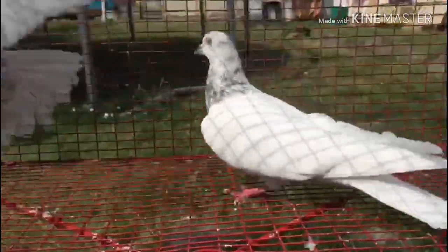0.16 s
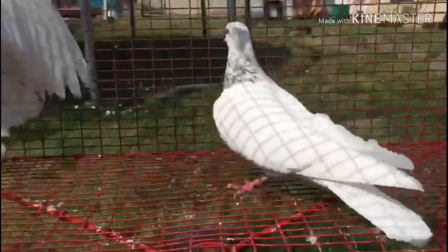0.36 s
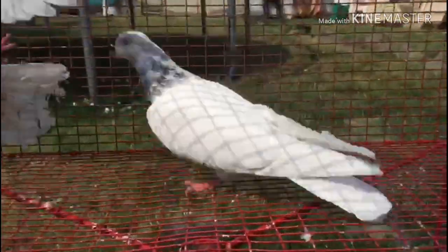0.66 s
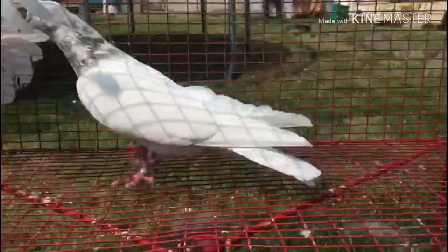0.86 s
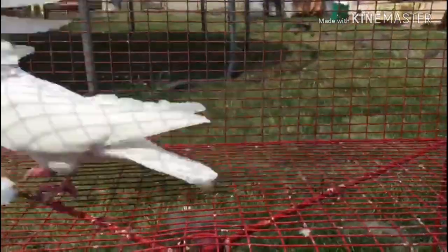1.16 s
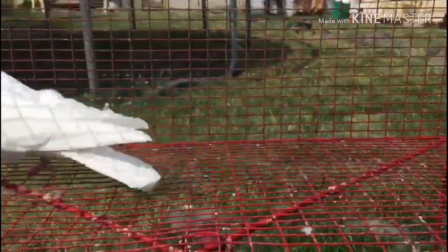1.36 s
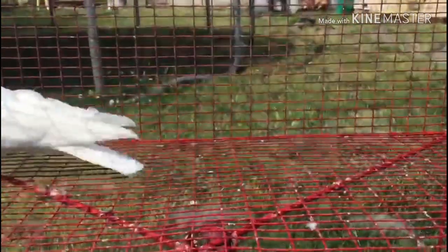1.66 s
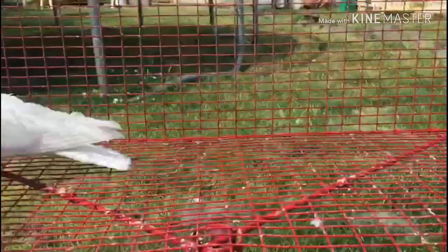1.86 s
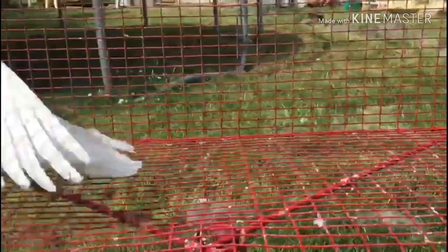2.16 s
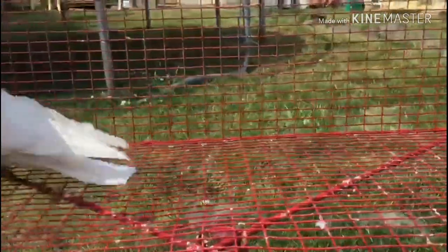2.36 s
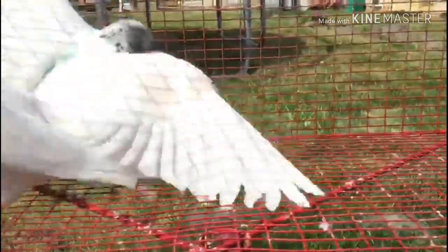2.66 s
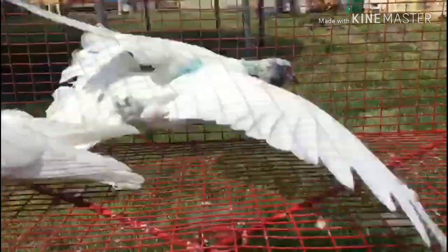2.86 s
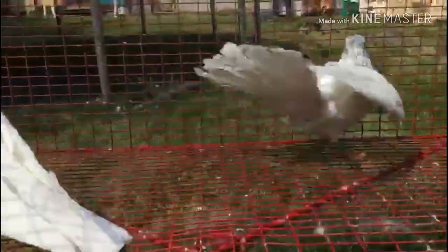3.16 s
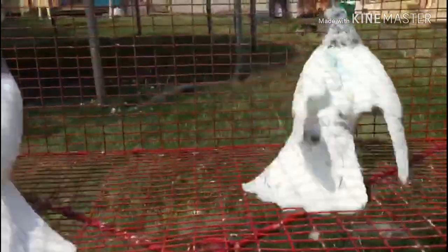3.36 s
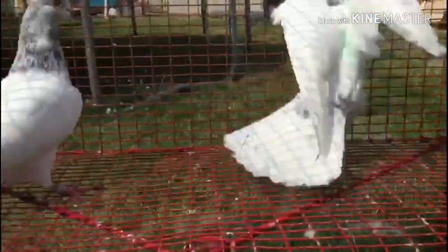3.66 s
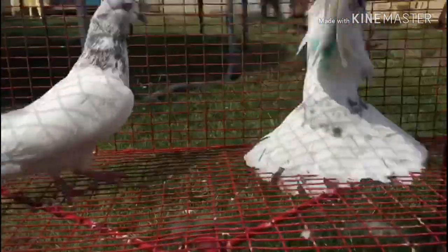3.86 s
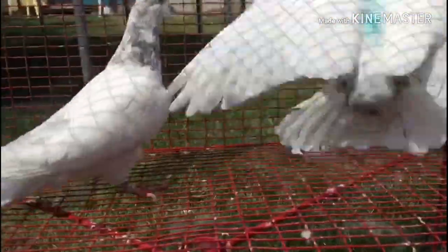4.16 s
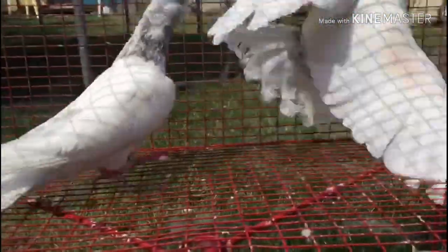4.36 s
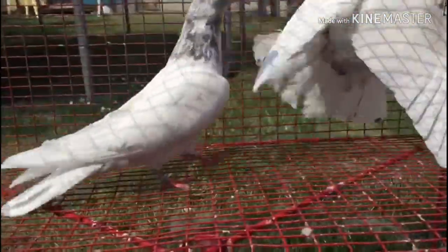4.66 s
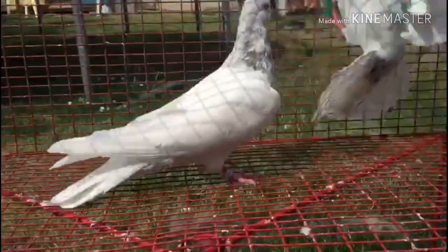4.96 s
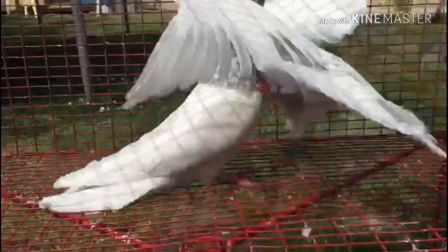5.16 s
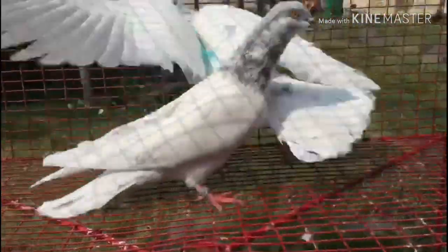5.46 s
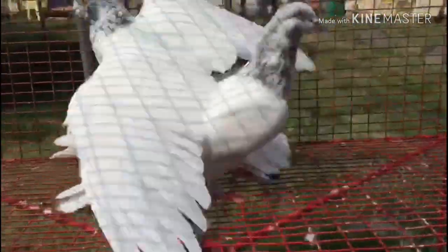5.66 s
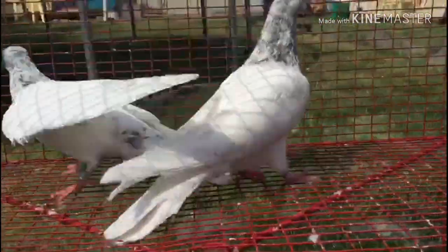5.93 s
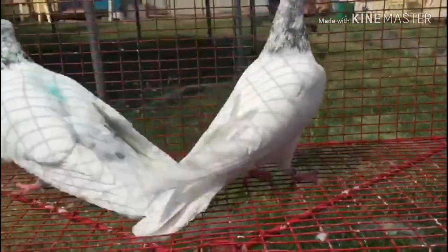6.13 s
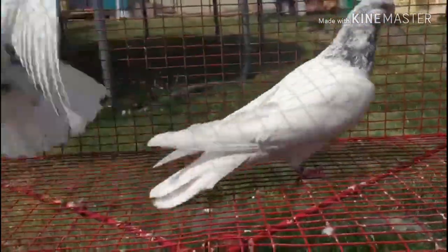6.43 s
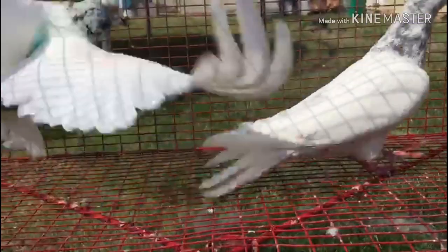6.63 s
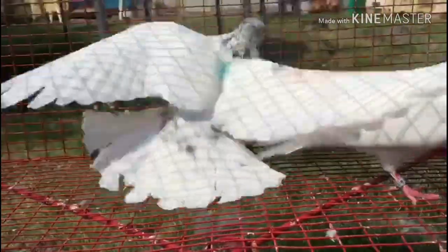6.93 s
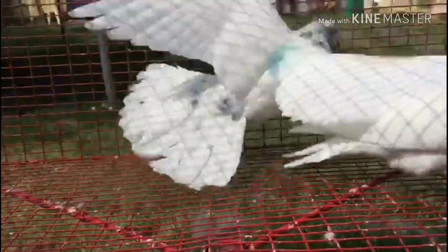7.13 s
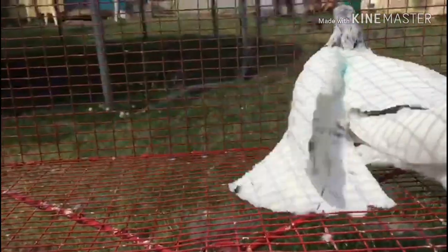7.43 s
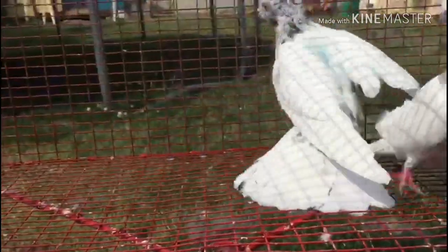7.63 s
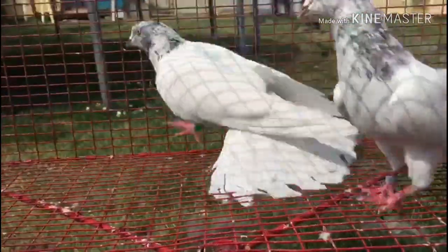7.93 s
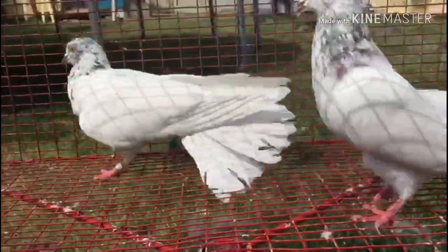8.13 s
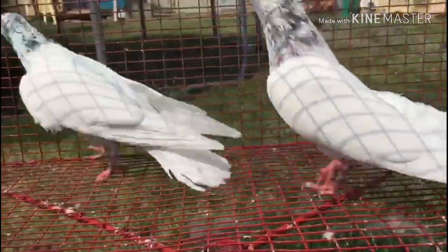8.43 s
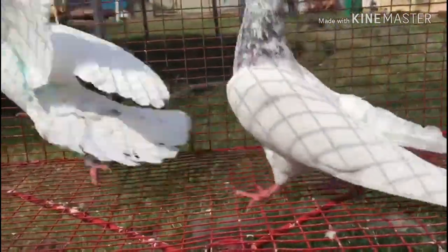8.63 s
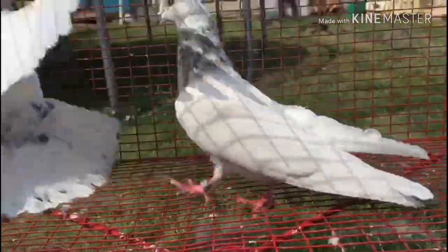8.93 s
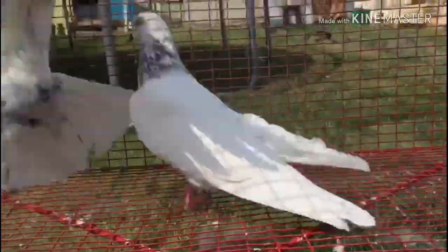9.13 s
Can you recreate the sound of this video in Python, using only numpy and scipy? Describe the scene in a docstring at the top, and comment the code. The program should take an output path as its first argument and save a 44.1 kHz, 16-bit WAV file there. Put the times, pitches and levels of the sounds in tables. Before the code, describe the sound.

Very close, dry outdoor sound of pigeons beating their wings behind wire mesh. Opening rustles and slaps lead to a hard wing clap, then thin out. Wings start again and batter the microphone in a rapid, overloaded cluster of thuds and cracks, followed by crisp claps. Lighter flapping returns, fades to soft coos and small metallic pings over faint open air, and flares up at the end.

```python
"""Pigeons fluttering in a wire cage

Two pigeons flutter on a lawn, a hand's width from the microphone. Feather friction is a train of
stick-slip clicks in swelling swishes; wing strokes crowd such clicks into slaps, and trapped air pops.
Damped low swings make the puffs of air and the thuds of one flurry that knocks the microphone.
Clusters of close modes ring as a wire pings; gliding tones coo nearby and filtered noise coos far off,
over outdoor air of shaped noise and a faint hum that is a sine of uneven level."""
import sys
import numpy as np
from scipy import signal
from scipy.fft import rfft, irfft
from scipy.io import wavfile
from scipy.ndimage import uniform_filter1d

SR = 44100
rng = np.random.default_rng(int(sys.argv[2]) if len(sys.argv) > 2 else 0)


def pcm_store(signal):
    """Save signal as 16-bit PCM."""
    levels = np.round(np.clip(np.atleast_2d(signal), -1, 1) * 32767)
    wavfile.write(sys.argv[1], SR, levels.astype(np.int16).T)


N = 409600

# Levels in the tables are relative; each layer adds its own offset. Brightness acts above 900 Hz only.
# Outdoor air, spectral density: [f/Hz, level/dB]
AIR_SPECTRUM = [(15, -30.5), (25, -14.5), (83, -5), (485, -2), (645, -2), (2560, -15.5), (3150, -18),
                (5030, -17.5), (5730, -16.5), (11300, -26.5), (12500, -53.5), (16200, -79.5), (22000, -120)]
# Pigeons cooing farther off: [t/s, level/dB]
FAR_COOING = [(0, -64.5), (2.4, -68.5), (3.1, -65.5), (4.6, -66.5), (6.2, -71.5), (9.29, -77.5)]
# Soft coos nearby: [t/s, length/s, start f/Hz, end f/Hz, level/dB]
NEAR_COOS = [(0.67, 0.15, 383, 295, -53), (1.858, 0.18, 515, 459, -54), (2.02, 0.2, 460, 433, -54.5),
             (2.977, 0.066, 375, 328, -52), (3.105, .075, 398, 360, -63), (3.252, 0.085, 419, 333, -63.5),
             (3.544, 0.2, 393, 405, -61.5), (7.48, 0.047, 625, 660, -66), (7.619, 0.056, 466, 480, -65),
             (7.8, 0.31, 485, 495, -58.5), (8.2, .06, 720, 746, -62.5)]
# Claws and quills catching a wire: [t/s, initial level/dB, central f/Hz]
WIRE_PINGS = [(2.3329, -29, 1860), (2.345, -36, 2760), (3.3039, -43.5, 4790), (3.4844, -46, 1970),
              (6.061, -41.5, 5700), (6.063, -48.5, 2903), (8.112, -33.5, 5830), (8.329, -46, 5640),
              (8.385, -46.5, 5420)]
# Breeze on the microphone: [t/s, level/dB]
BREEZE = [(0, -60), (2.3, -64.5), (3.6, -62.5), (6, -59.5), (7.5, -65), (8.6, -72.5), (9.29, -69)]
# Air pushed at the microphone by a downstroke: [t/s, level/dB, nominal swing f/Hz]
AIR_PUFFS = [(0.08, -20, 129), (0.243, -20, 80), (0.349, -30.5, 99), (1.098, -28, 104), (1.17, -16, 100),
             (1.212, -29, 140), (1.256, -22, 170), (1.313, -14, 124), (1.43, -18.5, 72),
             (2.151, -27.5, 174), (2.672, -21, 114), (2.705, -27, 190), (2.823, -20, 187),
             (2.861, -23, 175), (3.04, -29, 230), (4.222, -14.5, 102), (4.371, -14.5, 99),
             (4.431, -25, 186), (5.203, -11.5, 85), (5.271, -22, 154), (5.407, -31, 188), (6.501, -28, 100),
             (6.593, -27, 262), (6.637, -24, 162), (6.761, -20, 92), (6.805, -23, 91), (6.864, -16.5, 92),
             (6.925, -22.5, 105), (7.062, -23, 95), (7.304, -26.5, 161), (9.139, -22, 123),
             (9.209, -16.5, 118), (9.265, -14.5, 98)]
# Low eddies of air at the microphone, spectral density: [f/Hz, level/dB]
EDDY_SPECTRUM = [(18, -54.5), (30, -17), (64, 5), (125, 1.5), (267, -5), (377, -8), (430, -15.5),
                 (538, -17), (700, -22.5), (910, -39.5), (1540, -120)]
# Wings striking the housing: [t/s, crack level/dB, thud level/dB, nominal thud f/Hz, brightness/(dB/octave)]
HOUSING_KNOCKS = [(4.7579, -11, -9, 174, 0), (4.7814, -2.5, -15, 220, 0.5), (4.820, -16, -21.5, 153.3, 2),
                  (4.838, -6, -7.5, 278, -6.5), (4.871, 0, -18, 264, 1.5), (4.895, -10, -30, 101, 4.5)]
# Crack of a knock, spectral density: [f/Hz, level/dB]
CRACK_SPECTRUM = [(240, -23.5), (400, -1.5), (604, -2.5), (1760, 5), (2050, -4.5), (3430, -7), (3740, -16),
                  (7720, -30), (9290, -55), (12000, -49.5), (15600, -76), (22000, -120)]
# Flurries of rubbing feathers:
# [start t/s, end t/s, level/dB, brightness/(dB/octave), draught level at the microphone/dB]
FLURRIES = [(0, 0.38, -47, 2.5, -52), (0.435, 0.56, -47.5, 0, -58), (0.852, 1.06, -48, 1, -64),
            (1.07, 1.32, -45, 0, -48), (1.42, 1.66, -50, 3, -59), (1.89, 2.24, -56, -1, -60.5),
            (2.68, 2.862, -48, -2, -42), (3.856, 4.1, -46.5, 1.5, -50.5), (4.12, 4.438, -45, -1.5, -45.5),
            (4.46, 4.69, -46.5, 1, -63), (4.756, 5.291, -40, -3.5, -32.5), (5.302, 5.554, -47.5, -2.5, -42),
            (5.574, 5.836, -46, 1.5, -49), (6.463, 6.52, -57, 5, -46), (6.623, 7.063, -48.5, 3, -46),
            (7.117, 7.284, -52, 0, -56), (7.811, 8.139, -52.5, 1.5, -69.5), (8.782, 9.057, -44, 0.5, -55.5),
            (9.098, 9.3, -46, 1, -43.5)]
# A wing or tail sweeping past, one swish each: [peak t/s, level/dB, length/s, brightness/(dB/octave)]
SWEEPS = [(0.005, -27.5, 0.093, -2), (0.078, -34, 0.4, 0.0), (0.245, -33, 0.28, -1.5),
          (0.47, -37.5, 0.16, 1.5), (0.526, -37.5, 0.13, -0.5), (0.691, -36.0, 0.23, 1),
          (0.738, -40, 0.05, -2), (0.961, -35, 0.24, 0), (1.099, -31.5, 0.18, 0.5), (1.267, -38.5, 0.31, 0),
          (1.428, -32.5, 0.105, -0.5), (1.51, -43, 0.4, 1), (1.697, -44, 0.11, 0.5),
          (1.869, -39, 0.32, -1.5), (2.026, -42.5, 0.36, 2), (2.177, -40.5, 0.18, 1.5),
          (2.322, -49, 0.51, 0.5), (2.719, -38.5, 0.34, 0.5), (2.827, -36.5, 0.3, 0.0),
          (3.043, -26.5, 0.074, 2.0), (3.163, -49.5, 0.17, 4), (3.244, -45, 0.093, 5),
          (3.308, -52, 0.13, 6.5), (3.466, -48, 0.075, 4), (3.585, -55.5, 0.069, 3), (3.783, -59, 0.26, 6),
          (3.843, -43.5, 0.085, -0.5), (3.946, -38.5, 0.22, 0), (4.162, -32.5, 0.19, -1.0),
          (4.275, -34.5, 0.37, -0.5), (4.435, -37.5, 0.38, 1.5), (4.596, -37, 0.093, -1),
          (4.661, -43.5, 0.18, 3), (4.783, -20.5, 0.074, -7), (4.859, -24, 0.21, -7.5),
          (4.973, -30.5, 0.36, -1), (5.11, -34, 0.18, 1.5), (5.166, -27.5, 0.06, -1.5),
          (5.254, -21, 0.051, 0.5), (5.37, -34.0, 0.196, 0.0), (5.55, -35.5, 0.058, -0.5),
          (5.644, -38.0, 0.177, 1.5), (5.77, -26, 0.051, 0.5), (5.93, -58, 0.38, 3), (6.362, -55, 0.23, 2),
          (6.49, -31.5, 0.12, -0.5), (6.651, -32.5, 0.26, -0.5), (6.804, -37.5, 0.16, -2.5),
          (6.905, -38, 0.51, 0), (7.051, -33.0, 0.13, -0.5), (7.178, -34.5, 0.12, 4),
          (7.242, -36.5, 0.12, 1.5), (7.391, -44.5, 0.14, 0.5), (7.579, -52.5, 0.03, 0.0),
          (7.669, -50, 0.099, 5.5), (7.872, -43, 0.071, 2.0), (8.019, -48, 0.32, 1),
          (8.131, -43.5, 0.06, 1.5), (8.324, -55, 0.19, 4), (8.828, -48.0, 0.29, 1.5),
          (8.9, -36.5, 0.1, -0.5), (9.114, -32.0, 0.18, -1.5), (9.186, -25, 0.082, -2.5),
          (9.263, -30, 0.073, -0.5)]
# Rubbing feathers, spectral density: [f/Hz, level/dB]
FEATHER_SPECTRUM = [(120, -28), (200, -5.5), (443, -3.5), (575, -4.5), (812, -7), (917, -3.5), (2180, -5.5),
                    (2460, -4.5), (4200, -6), (4910, -6.5), (5740, -3), (7700, -7.5), (9310, -4.5),
                    (11500, -10), (12500, -23.5), (16200, -61.5), (22000, -120)]
# Wings meeting squarely: [t/s, initial level/dB, air pocket f/Hz]
WING_CLAPS = [(0.0805, -9.5, 2570), (1.314, -3, 2900), (4.3683, -18, 1410), (5.2428, -6.5, 1790),
              (5.7578, -18, 876)]
# Slaps of a wing on the other wing or the mesh: [t/s, level/dB, brightness/(dB/octave)]
WING_STROKES = [(.012, -25, -.5), (.081, -13.5, 2.2), (.194, -26, 0.5), (.221, -32, -1),
                (.2493, -20.5, 0.5), (.264, -32, 1), (.2867, -31, 0), (.3023, -30.5, 6), (.506, -39, 2),
                (.4668, -34.5, 2), (.574, -37.5, 2), (1.0684, -28, -2.5), (1.089, -27, 6),
                (1.0935, -24, -3), (1.0985, -23, -2), (1.1704, -22, 0.5), (1.2127, -29.5, -3.5),
                (1.259, -31.5, -22), (1.3156, -10, 1), (1.418, -28, -20), (1.4243, -20.5, -0.5),
                (1.703, -39, 0.5), (2.1514, -37.5, -5), (2.6893, -27.5, 3), (2.8258, -26, -3.5),
                (2.8596, -24.5, -3), (3.0392, -21.5, 1.5), (3.4893, -50, -1.5), (3.833, -35, 2.2),
                (3.974, -37.5, -2), (4.003, -29.5, 1.5), (4.2213, -25, 2.5), (4.27, -24.5, 0),
                (4.281, -28.5, -2), (4.344, -30, -2.5), (4.3688, -18, 0), (4.439, -30, -2),
                (4.484, -33, 1.5), (4.5692, -33, 3), (4.586, -32, 2), (4.917, -25, 1), (4.974, -24, 7),
                (5.0028, -23.5, -1), (5.1093, -25.5, 1), (5.1606, -25, 1.5), (5.189, -26.5, 2.5),
                (5.2026, -22.5, -1), (5.2435, -12, 1.5), (5.2475, -13.5, 2), (5.27, -20, 7),
                (5.3354, -30.5, 2), (5.363, -32.5, 0), (5.4087, -25, 0), (5.6305, -33, 2), (5.759, -24, 1),
                (5.7631, -22, 2.5), (5.775, -27, 2.5), (6.4693, -28.5, 1.5), (6.4983, -28, 1),
                (6.595, -43, -13), (6.641, -29.5, -0.5), (6.683, -27, 2), (6.696, -25, 0.5),
                (6.753, -31.5, 0.5), (6.797, -29, -0.5), (6.812, -33, 1.5), (6.8664, -32, 0.5),
                (6.928, -28.5, -1.5), (6.937, -29, -.5), (7.001, -36.5, 7), (7.0317, -33, -2),
                (7.06, -30, -3.5), (7.262, -37, 2.5), (7.3713, -34, 0), (7.813, -41.5, 1.5),
                (8.7826, -40.5, -3.5), (8.822, -36.5, -0.5), (8.861, -36, -1), (8.89, -33, -0.5),
                (8.975, -38.5, 1), (9.0223, -32.5, 5), (9.0613, -31.5, -1.5), (9.1059, -27.5, 2.5),
                (9.1573, -23.5, 2.5), (9.196, -29, -3), (9.2437, -28, 3), (9.2655, -25, -1)]
# Slapping quills and scraped wire, spectral density: [f/Hz, level/dB]
SLAP_SPECTRUM = [(120, -36.5), (200, -1.5), (1130, 1), (1680, 0.5), (2140, -1.5), (2820, -2), (3850, -2),
                 (4830, -6), (5640, -3), (7440, -7.5), (9310, -5.5), (11500, -12), (12500, -26),
                 (16200, -55.5), (22000, -120)]

AIR_DB = -70.5
HUM_HZ, HUM_DB = 57.6, -66.5
FAR_COO_HZ, FAR_COO_WIDTH_HZ = 355, 85
SHUFFLE_DB = -66.5   # the birds are never quite still
START_DB_PER_S, SETTLE_DB_PER_S = 1098.5, 267.5   # slopes at the two ends of a flurry
SWELL_SHARE, SWEEP_DEPTH_DB = 0.37, 21   # rising share of a swish; how far below its peak its ends lie
WAKE_S, SHUDDER_S = 0.052, 0.1   # length of the eddies around a puff; time a knock's rumble takes to fall 20 dB
# a slap's time constant at that level; one this much harder has half of it; upper limit
SLAP_S, SLAP_AT_DB, HALVING_DB, LONGEST_SLAP_S = .002, -27, 20, .0036
CUTOFF_HZ = 12200
BURST, LEAD_S = 4096, .003   # samples in a short sound; silence before a burst
TIME = np.arange(N) / SR
AGE = np.arange(BURST) / SR
STEPS = TIME[::44]   # coarse clock for slow movements


def from_db(db):
    """Logarithmic level: 20 dB is a factor of ten in amplitude."""
    return 10 ** (np.asarray(db) / 20)


def rms_one(x):
    """Normalization: the mean square becomes 1."""
    return x / np.sqrt(np.mean(x ** 2) + 1e-20)


def in_time(rows):
    """Linear interpolation: each column of a curve at every sample."""
    s, *columns = np.transpose(rows)
    return [np.interp(TIME, s, column) for column in columns]


def add(out, s, sound):
    """Superposition: pressures add, from a given time on."""
    start = max(round(s * SR), 0)
    out[start:start + len(sound)] += sound[:N - start]


def gain_at(spectrum, hz):
    """Spectral envelope: levels are interpolated along logarithmic frequency."""
    points, db = np.transpose(spectrum)
    return from_db(np.interp(np.log(hz + 1), np.log(points), db))


def tilted(hz, brightness):
    """Spectral slope: constant dB per octave about 3 kHz, flat below 900 Hz."""
    return from_db(brightness * np.log2(np.maximum(hz, 900) / 3000))


def coloured(x, spectrum):
    """Linear filtering: a signal takes on a spectral envelope, at rms 1."""
    hz = np.fft.rfftfreq(len(x), 1 / SR)
    return rms_one(irfft(rfft(x) * gain_at(spectrum, hz), len(x)))


def wobble(rate, size=N):
    """Random modulation: straight lines join this many normal values a second."""
    place = np.arange(size) * rate / SR
    count = int(place[-1]) + 2
    return np.interp(place, np.arange(count), rng.standard_normal(count))


def barbs(per_s, spread_db, hiss, size=N):
    """Stick-slip friction: barbs catch and slip as uneven clicks on a smooth hiss."""
    slips = (rng.random(size) < per_s / SR) * rng.choice([-1, 1], size)
    sizes = from_db(spread_db * np.minimum(rng.exponential(1, size), 4))
    return rms_one(slips * sizes) + hiss * rng.standard_normal(size)


def burst(slips, length, spectrum, brightness, blur_hz):
    """Impact transient: a fast swell and slower fall in one colour; rms 1 over twice its time constant."""
    age = np.maximum(AGE - LEAD_S, 0) / length
    shape = rfft(slips * np.sqrt(age) * np.exp(-age))
    hz = np.fft.rfftfreq(BURST, 1 / SR)
    # only the fine ripple of the spectrum is left to chance
    broad = uniform_filter1d(np.abs(shape) ** 2, int(blur_hz / hz[1]) + 1)
    ripple = shape / np.sqrt(broad + 1e-12)
    sound = irfft(ripple * gain_at(spectrum, hz) * tilted(hz, brightness), BURST)
    return sound * np.sqrt(2 * length * SR / np.sum(sound ** 2))


def swing(hz, cycles, sag):
    """Damped oscillation: a pressure push and its rebound, slowing as it dies away."""
    turns = hz * AGE * (1 + sag * np.exp(-hz * AGE)) / (1 + sag / 2)
    decay = from_db(-60 * turns / cycles)
    onset = 1 - np.exp(-12 * turns)
    return -np.sin(2 * np.pi * turns) * decay * onset


def outdoor_air():
    """Ambient noise: a stationary random pressure with a fixed spectral envelope."""
    return from_db(AIR_DB) * coloured(rng.standard_normal(N), AIR_SPECTRUM)


def hum():
    """Amplitude modulation: a faint low sine whose level wavers at random."""
    return from_db(HUM_DB + 3.7 * wobble(rate=27)) * np.sqrt(2) * np.sin(2 * np.pi * HUM_HZ * TIME)


def far_coos(swell_db):
    """Incoherent summation: many distant coos blur into one low, swelling band of noise."""
    level, = in_time(FAR_COOING)
    hz = np.fft.rfftfreq(N, 1 / SR)
    resonance = 1 / (1 + (2 * (hz - FAR_COO_HZ) / FAR_COO_WIDTH_HZ) ** 2)
    drone = irfft(rfft(rng.standard_normal(N)) * resonance, N)
    return from_db(level + swell_db * wobble(rate=10)) * rms_one(drone)


def coos(level_db, waver, breathy):
    """Modulated phonation: a gliding throat tone is blurred by a husky purr."""
    out = np.zeros(N)
    for s, length, start_hz, end_hz, db in NEAR_COOS:
        size = int(length * SR)
        pitch = np.linspace(start_hz, end_hz, size) * (1 + waver * wobble(rate=100, size=size))
        # complex modulation varies both amplitude and phase
        purr = 1 + breathy * (wobble(rate=140, size=size) + 1j * wobble(rate=86, size=size))
        tone = rms_one(np.real(purr * np.exp(2j * np.pi * np.cumsum(pitch) / SR)))
        add(out, s, from_db(db + level_db) * signal.windows.tukey(size, .5) * tone)
    return out


def pings(level_db, t60, spread, scrape_db):
    """Modal resonance: a short scrape sets joined wires ringing in a cluster of close modes."""
    out = np.zeros(N)
    for s, db, hz in WIRE_PINGS:
        modes = hz * np.exp(spread * rng.standard_normal((24, 1)))
        phases = rng.random((24, 1))
        ring = rms_one(np.sin(2 * np.pi * (modes * AGE + phases)).sum(axis=0))
        friction = barbs(per_s=2000, spread_db=7.5, hiss=0.4, size=BURST)
        scrape = from_db(scrape_db) * coloured(friction, SLAP_SPECTRUM)
        add(out, s, from_db(db + level_db - 60 * AGE / t60) * (ring + scrape))
    return out


def swell(s, db, length):
    """Exponential growth and decay: one movement's power rises to a peak and fades more slowly."""
    place = (STEPS - s) / length
    depth = np.maximum(-place / SWELL_SHARE, place / (1 - SWELL_SHARE))
    return from_db(db - SWEEP_DEPTH_DB * np.minimum(depth, 10)) ** 2


def held(start, end, db):
    """Sustained excitation: a flurry's power starts abruptly, holds and settles."""
    below = np.maximum((start - STEPS) * START_DB_PER_S, (STEPS - end) * SETTLE_DB_PER_S)
    return from_db(db - np.clip(below, 0, 200)) ** 2


def feather_motion():
    """Addition of powers: flurries and sweeps give rows of t/s, level/dB, brightness/(dB/octave)."""
    parts = [(swell(s, db, length), brightness) for s, db, length, brightness in SWEEPS]
    parts += [(held(start, end, db), brightness) for start, end, db, brightness, _ in FLURRIES]
    power = sum(p for p, _ in parts) + from_db(SHUFFLE_DB) ** 2
    # weighting by power lets the loudest movement set the colour
    colour = sum(p * brightness for p, brightness in parts) / power
    return np.transpose([STEPS, 10 * np.log10(power), colour])


def wing_air(motion, puff_db, draught_db, stir_db, wake_db, shudder_db, lumpy_db):
    """Flow noise: downstrokes push low puffs; eddies follow flurries and puffs and rumble after knocks."""
    out = np.zeros(N)
    for s, db, hz in AIR_PUFFS:
        add(out, s, from_db(db + puff_db) * swing(hz, cycles=2.3, sag=0.41))
    breeze = from_db(np.interp(STEPS, *np.transpose(BREEZE))) ** 2
    stir = from_db(motion[:, 1] + stir_db) ** 2
    draught = sum(held(start, end, db + draught_db) for start, end, _, _, db in FLURRIES)
    wake = sum(swell(s, db + wake_db, WAKE_S) for s, db, _ in AIR_PUFFS)
    power = breeze + stir + draught + wake
    for s, _, thud, _, _ in HOUSING_KNOCKS:
        rumble_db = thud + shudder_db - 20 * np.abs(STEPS - s) / SHUDDER_S
        power = power + (STEPS > s) * from_db(rumble_db) ** 2
    eddies = coloured(rng.standard_normal(N), EDDY_SPECTRUM) * from_db(lumpy_db * wobble(rate=50))
    return out + np.interp(TIME, STEPS, np.sqrt(power)) * eddies


def knocks(crack_db, thud_db, crack_s):
    """Structural impact: a blow on the housing gives a dull crack and a heavy, quickly damped thud."""
    out = np.zeros(N)
    for s, crack, thud, hz, brightness in HOUSING_KNOCKS:
        slap = burst(rng.standard_normal(BURST), crack_s, CRACK_SPECTRUM, brightness, blur_hz=590)
        add(out, s - LEAD_S, from_db(crack + crack_db) * slap)
        add(out, s + .001, from_db(thud + thud_db) * swing(hz, cycles=4.65, sag=.4))
    return out


def quill_ticks(motion, per_s, level_db, spread_db, cycles):
    """Damped resonance: quills flick past each other in dry pitched ticks that follow the rubbing."""
    db, brightness = in_time(motion)
    out = np.zeros(N)
    for when, size, pitch in rng.random((int(per_s * N / SR), 3)):
        hz = 1500 * 7 ** pitch
        at = int(when * N)
        level = db[at] + level_db + spread_db * (size - 1)
        strength = from_db(level) * min(tilted(hz, brightness[at]), 1)
        # falls 60 dB in the given number of cycles
        decay = np.exp(-np.minimum(np.log(1000) * hz * AGE / cycles, 20))
        add(out, at / SR, strength * np.cos(2 * np.pi * hz * AGE) * decay)
    return out


def catches(per_s, release_s, steady):
    """Relaxation: each feather snags, lets go at once and slides to rest; rms 1."""
    snags = (rng.random(N) < per_s / SR) * rng.exponential(1, N)
    energy = signal.lfilter([1], [1, -np.exp(-1 / (release_s * SR))], snags + 1e-18)
    return rms_one(np.sqrt(steady + energy))


def rustle(motion, level_db, patchy_db, patchy_rate):
    """Clumped stick-slip: barbs slip in clumps as feathers slide past, in ever-changing colours."""
    db, brightness = in_time(motion)
    friction = barbs(per_s=3000, spread_db=1.5, hiss=0.79) * catches(per_s=130, release_s=0.0067, steady=0.89)
    hz = np.fft.rfftfreq(N, 1 / SR)
    friction = rfft(friction) * gain_at(FEATHER_SPECTRUM, hz)
    centres = np.linspace(np.sqrt(300), np.sqrt(12000), 26) ** 2
    out, power = 0, 0
    # overlapping triangular bands, each with its own random level
    for centre, share in zip(centres, np.eye(len(centres))):
        band = irfft(friction * np.interp(hz, centres, share), N)
        gain = tilted(centre, brightness) * from_db(patchy_db * wobble(rate=patchy_rate))
        out = out + band * gain
        power = power + np.mean(band ** 2) * gain ** 2
    return from_db(db + level_db) * out / np.sqrt(power)


def claps(level_db, t60):
    """Cavity resonance: wings meeting squarely trap a pocket of air that pops at its own pitch."""
    out = np.zeros(N)
    for s, db, hz in WING_CLAPS:
        add(out, s, from_db(db + level_db - 60 * AGE / t60) * np.sin(2 * np.pi * hz * AGE))
    return out


def strokes(motion, level_db, flicks_per_s, flick_db, flick_spread_db):
    """Crowded impacts: quills slap in a few milliseconds of slips, shorter the harder they hit."""
    # light flicks fall at random, their level following the rubbing around them
    flicks = []
    for when, size in rng.random((int(flicks_per_s * N / SR), 2)):
        s, db, brightness = motion[int(when * len(motion))]
        flicks.append((s, db + flick_db - flick_spread_db * size, brightness))
    out = np.zeros(N)
    for s, db, brightness in list(WING_STROKES) + flicks:
        length = min(SLAP_S * 2 ** ((SLAP_AT_DB - db) / HALVING_DB), LONGEST_SLAP_S)
        slips = barbs(per_s=6000, spread_db=2.0, hiss=0.67, size=BURST)
        slap = burst(slips, length, SLAP_SPECTRUM, brightness, blur_hz=1210)
        add(out, s - length - LEAD_S, from_db(db + level_db) * slap)
    return out


def yard(x, wet_db, t60):
    """Diffuse scattering: ground and nearby walls return a thin, short decaying noise response."""
    age = TIME[:SR // 2]
    tail = rng.standard_normal(len(age)) * from_db(-60 * age / t60) * (age > .004)
    return x + from_db(wet_db) * signal.fftconvolve(x, tail / np.sqrt(np.sum(tail ** 2)))[:N]


def scene():
    """Superposition of sources: the birds close by, over quiet outdoor air."""
    background = outdoor_air() + hum() + far_coos(swell_db=2.5)
    cage = (pings(level_db=-8.5, t60=0.11, spread=0.12, scrape_db=-9)
            + coos(level_db=0.0, waver=0.024, breathy=.75))
    motion = feather_motion()
    microphone = (wing_air(motion, puff_db=3.0, draught_db=-1.0, stir_db=-18.5, wake_db=-19,
                           shudder_db=-15, lumpy_db=3.5)
                  + knocks(crack_db=-11.5, thud_db=14.0, crack_s=0.0025))
    sliding = (rustle(motion, level_db=-1.48, patchy_db=4.0, patchy_rate=30)
               + quill_ticks(motion, per_s=45, level_db=17.5, spread_db=15.5, cycles=7.2))
    beating = (strokes(motion, level_db=0.8, flicks_per_s=5, flick_db=3, flick_spread_db=6)
               + claps(level_db=-2.5, t60=0.012))
    # air and blows that reach the microphone directly are not scattered
    return (yard(sliding + beating + cage, wet_db=-23.5, t60=0.041) + microphone + background)[None]


def record(dry):
    """Band limiting and overload: deep bass is dropped, the loudest blows clip and the top is cut."""
    thin = signal.sosfilt(signal.butter(4, 45, "high", fs=SR, output="sos"), dry)
    clipped = np.clip(thin, -.85, .85)
    return signal.sosfilt(signal.ellip(12, .3, 100, CUTOFF_HZ, fs=SR, output="sos"), clipped)


dry = scene()
out = record(dry)
pcm_store(out)
```